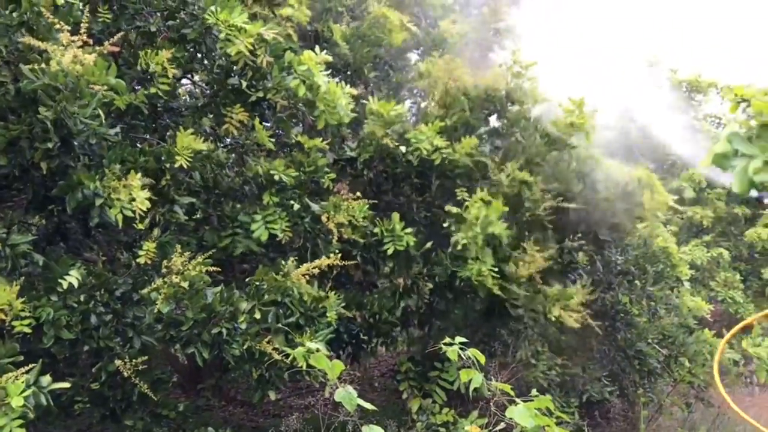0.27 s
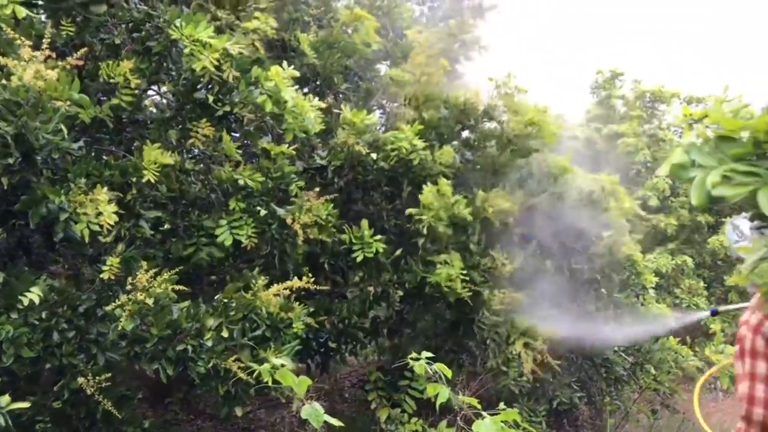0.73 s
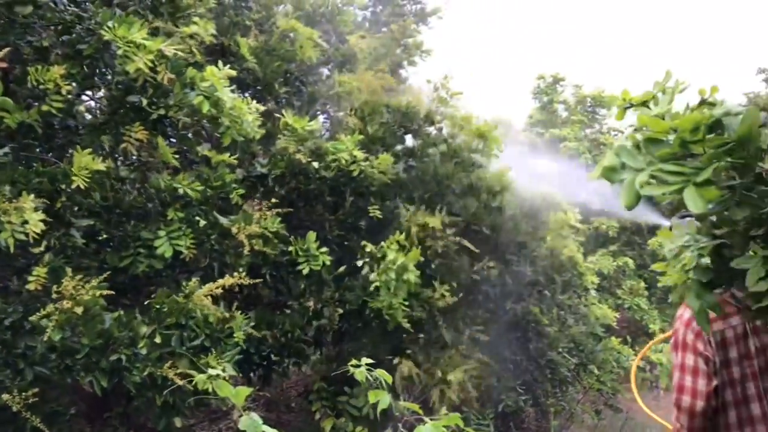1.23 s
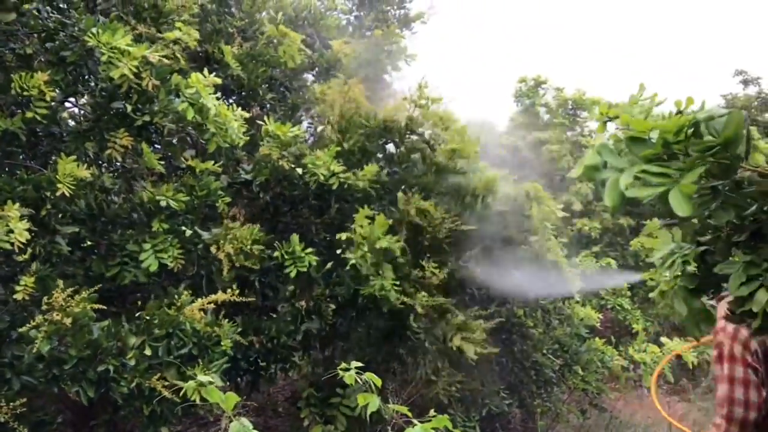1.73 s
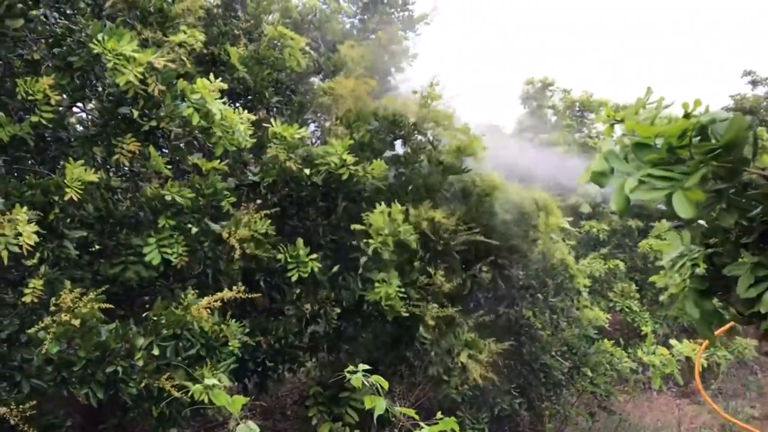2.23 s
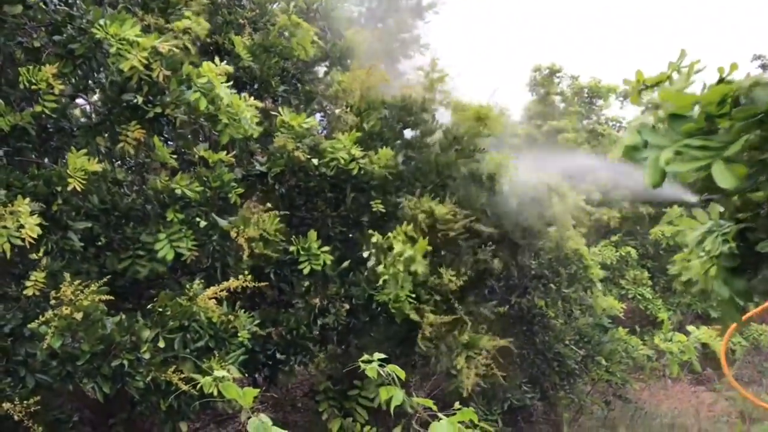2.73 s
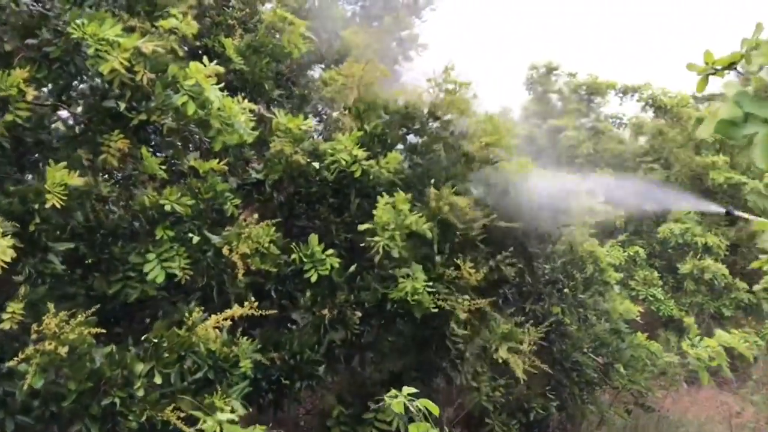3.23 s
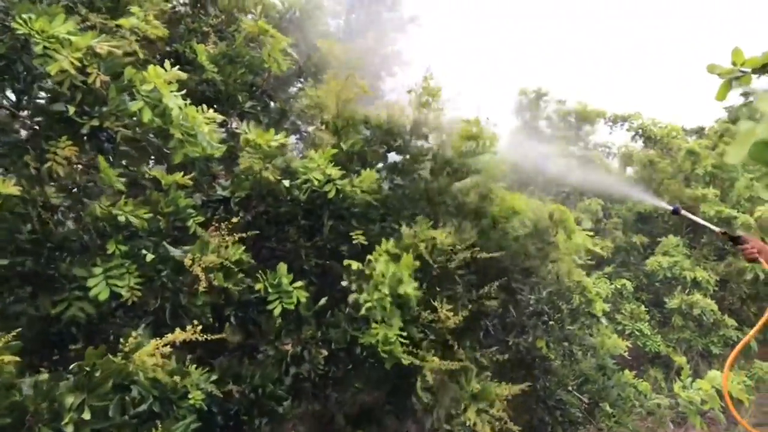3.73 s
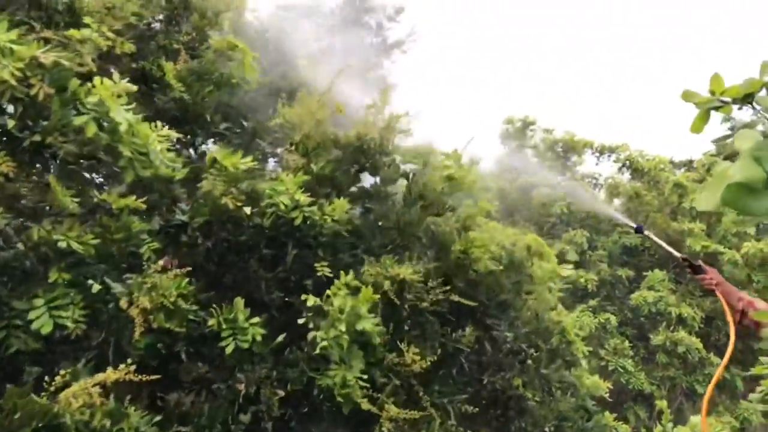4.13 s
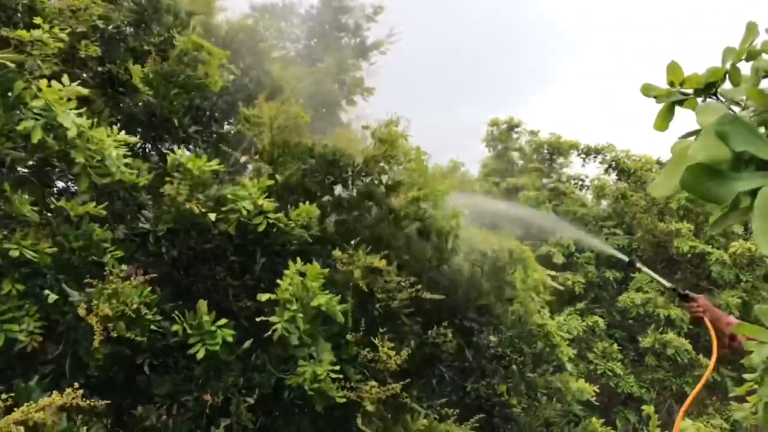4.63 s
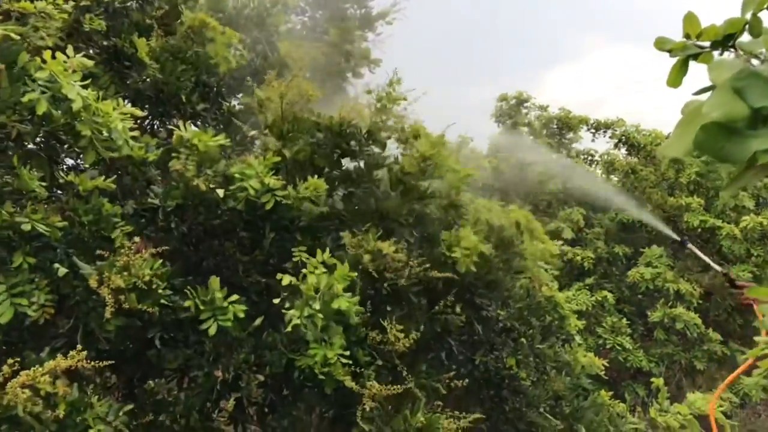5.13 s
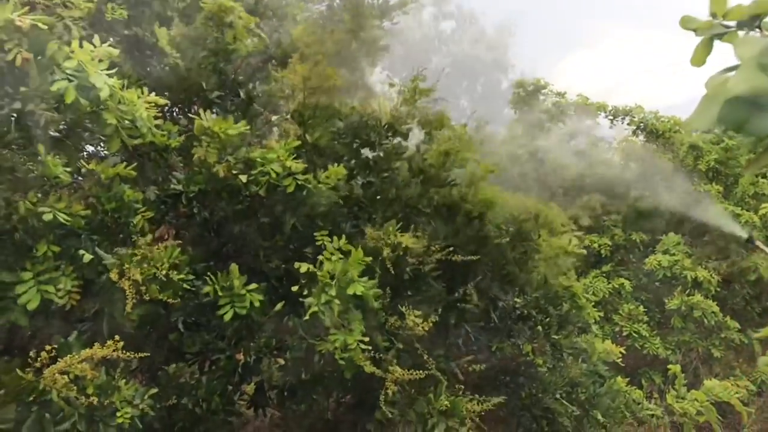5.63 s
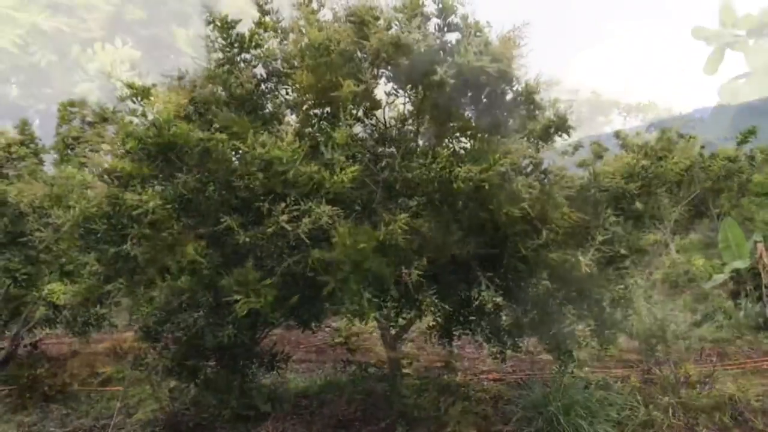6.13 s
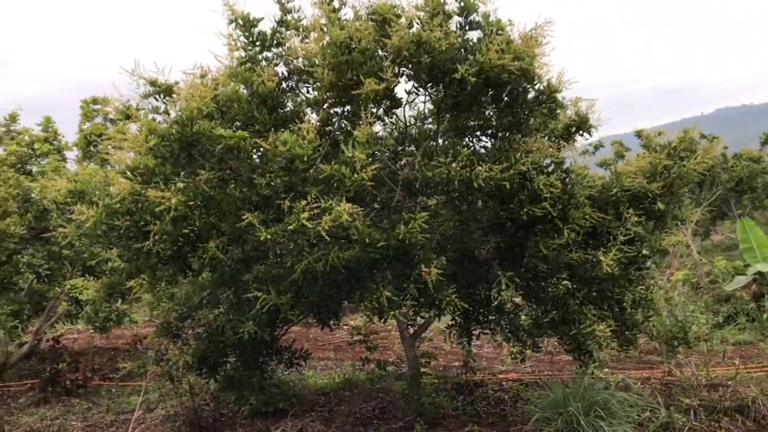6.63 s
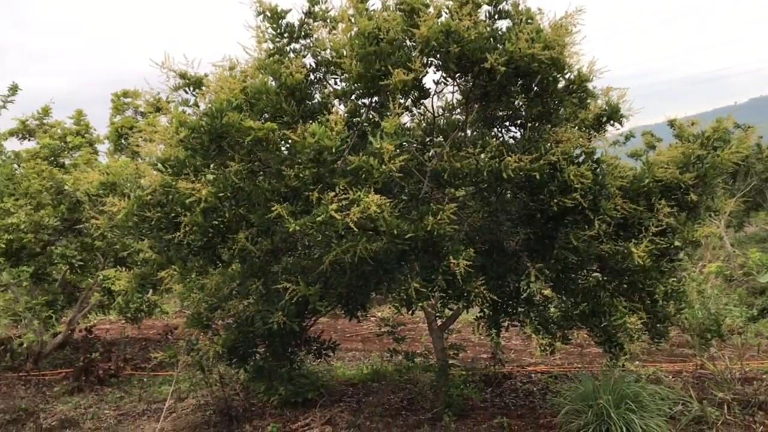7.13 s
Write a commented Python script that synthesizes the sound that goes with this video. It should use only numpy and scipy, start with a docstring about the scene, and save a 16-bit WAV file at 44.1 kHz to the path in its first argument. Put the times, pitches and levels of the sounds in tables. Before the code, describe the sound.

Hissing spray sweeps across foliage in uneven surges, a small engine throbbing far off, before giving way to light wind and faint chirps.

```python
"""A pressure wand sprays mist into orchard trees. The turbulent jet hisses at the nozzle; droplets patter
on leaves at each sweep and now and then slap close by. A small pump engine throbs further off.
The spraying fades into a quiet orchard: wind on the microphone, low rustle, a dull tap and faint chirps.
With these comes a soft mid-range hush with a faint, even high hiss on top.
One microphone feeds both channels."""
import sys
import numpy as np
from scipy import signal
from scipy.fft import rfft, irfft, next_fast_len
from scipy.io import wavfile
from scipy.ndimage import uniform_filter1d, map_coordinates

SR = 44100
rng = np.random.default_rng(int(sys.argv[2]) if len(sys.argv) > 2 else 0)


def store_wav(level_fs):
    """Save 16-bit WAV to argv[1]."""
    pcm = np.round(np.clip(np.atleast_2d(level_fs), -1, 1) * 32767)
    wavfile.write(sys.argv[1], SR, pcm.T.astype(np.int16))


N = 325458
TIME_S = np.arange(N) / SR

# jet, narrower and stronger midway: t/s, nozzle band level/dB, mist level between sweeps/dB
JET_LEVELS = [(0.0, -53.5, -46), (1.5, -54, -52), (2.9, -53.5, -51), (3.5, -52.5, -42.5), (4.3, -52, -43),
              (4.75, -52, -43), (5.5, -53.5, -41.5), (6.45, -54, -41)]
# spectra of fine and fat drops on leaves: f/Hz, density/dB
FINE_SPECTRUM = [(800, -38), (2500, -14.5), (4000, -7.5), (8000, -1.5), (16000, 1.5)]
FAT_SPECTRUM = [(200, -18), (1000, -11), (2500, -5.5), (4000, 0), (7000, 0.5), (16000, -4.5)]


def amp(db):
    """dB to gain."""
    return 10 ** (np.asarray(db) / 20)


def unit(x):
    """Scale to rms 1."""
    return x / np.sqrt(np.mean(x ** 2) + 1e-20)


def curves(rows):
    """Per-sample curve for each column after t/s."""
    times_s, *columns = np.transpose(rows)
    return [np.interp(TIME_S, times_s, column) for column in columns]


def wobble(rate_hz):
    """Smooth random curve, rms about 1."""
    knots = rng.standard_normal(int(N * rate_hz / SR) + 4)
    return map_coordinates(knots, [TIME_S * rate_hz])


def filtered(x, response):
    """Zero-phase filter with gain response(hz)."""
    size = next_fast_len(N + 8192)
    return irfft(rfft(x, size) * response(np.fft.rfftfreq(size, 1 / SR)), size)[..., :N]


def coloured(x, spectrum, band_hz=(0, SR)):
    """Shape by (f/Hz, level/dB) points on a log axis; rms 1 in the band."""
    points_hz, db = np.transpose(spectrum)
    shaped = filtered(x, lambda hz: amp(np.interp(np.log(hz + 1), np.log(points_hz + 1), db)))
    return shaped / np.std(filtered(shaped, lambda hz: (hz >= band_hz[0]) & (hz <= band_hz[1])))


def patchy(depth_db, frames=10):
    """White noise with random gain patches in time and frequency."""
    bins = signal.stft(rng.standard_normal(N), nperseg=512)[2]
    patches = uniform_filter1d(rng.standard_normal(bins.shape), size=5, axis=0)
    patches = uniform_filter1d(patches, size=frames, axis=1)
    return signal.istft(bins * amp(depth_db * unit(patches)), nperseg=512)[1][:N]


def swell_power(at_s, hold_s, db, rise_db_per_s, fall_db_per_s):
    """Power envelope: rise until at_s, hold, fall."""
    before_s = np.maximum(at_s - TIME_S, 0)
    after_s = np.maximum(TIME_S - at_s - hold_s, 0)
    return amp(db - rise_db_per_s * before_s - fall_db_per_s * after_s) ** 2


def bell(at_s, half_width_s, exponent=2):
    """Envelope with peak 1, down to 1/e one half-width away."""
    return np.exp(-np.abs((TIME_S - at_s) / half_width_s) ** exponent)


def nozzle():
    """Turbulent jet: broad rush whose colour drifts as the wand swings."""
    spectrum = [(60, -41), (150, -5), (310, -5.5), (500, -7), (620, -6), (740, -4), (900, -4), (1050, -0.5),
                (2500, -3), (6000, -7.5), (16000, -9)]  # jet noise: f/Hz, density/dB
    jet_db, _ = curves(JET_LEVELS)
    rush = coloured(patchy(depth_db=0.7, frames=50), spectrum, band_hz=(700, 2000))
    return amp(jet_db + 0.83 * wobble(7)) * rush


def droplets(rate_hz, spread_db):
    """Random impacts of either sign and uneven size."""
    hits = rng.random(N) < rate_hz / SR
    signs = rng.choice([-1, 1], N)
    sizes = amp(spread_db * np.clip(rng.standard_normal(N), -2, 2))
    return unit(hits * signs * sizes)


def foliage():
    """Mist hiss and impacts on leaves; near leaves give fatter, duller, sparser drops."""
    # jet sweeps over foliage: t/s, hold/s, level/dB, rise/(dB/s), nearness 0-1
    sweeps = [(0.0, 0.18, -38.5, 70, 0.27), (.47, 0.23, -40, 70, 0.38), (.79, 0.027, -38, 43, .3),
              (0.913, .02, -37, 52, 0.45), (1.07, .01, -41, 60, 0.24), (1.34, .01, -41, 47, 0.4),
              (1.687, .31, -41.5, 47, 0.39), (2.303, .02, -40.5, 48, 0.47), (2.585, .03, -45, 50, .2),
              (2.715, 0.054, -36, 60, 0.37), (3.223, 0.06, -34.5, 39, 0.3), (3.76, .02, -36.5, 67, .14),
              (4.176, .01, -41.5, 50, .25), (4.446, .01, -33, 110, 0.35), (4.524, 0.0091, -34, 140, 0),
              (4.608, 0.024, -31, 107, .6), (5.5, 0.073, -45.5, 40, 0), (5.97, 0.23, -38.5, 41, 0.08)]
    mist_nearness, fall_ratio = 0.34, 1.96  # the jet exits foliage faster than it enters
    _, mist_db = curves(JET_LEVELS)
    mist_power = amp(mist_db) ** 2
    fine_power, fat_power = (1 - mist_nearness) * mist_power, mist_nearness * mist_power
    for at_s, hold_s, db, rise_db_per_s, nearness in sweeps:
        power = swell_power(at_s, hold_s, db, rise_db_per_s, fall_ratio * rise_db_per_s)
        fine_power += (1 - nearness) * power
        fat_power += nearness * power
    fine = coloured(patchy(depth_db=2) + 0.25 * droplets(rate_hz=900, spread_db=1), FINE_SPECTRUM)
    fat = coloured(patchy(depth_db=1.75) + 0.38 * droplets(rate_hz=600, spread_db=3.5), FAT_SPECTRUM)
    flutter_db = 0.7 * wobble(25) + 0.33 * wobble(70)  # leaves flap in and out of the jet
    return amp(flutter_db) * (np.sqrt(fine_power) * fine + np.sqrt(fat_power) * fat)


def stumble_db():
    """Engine level offset: the note swells, then drops out briefly."""
    stumbles = [(.33, 3.5, 13), (1.19, 2, 11), (2.17, 3, 14), (2.86, 5, 18), (3.9, 4, 12), (4.22, 2.5, 7),
                (5.0, 2, 1), (5.45, -1, 0), (5.8, 1.5, 9)]  # engine dropouts: t/s, swell/dB, depth/dB
    lead_s, swell_s, drop_s = 0.13, 0.15, 0.058
    return sum(swell_db * bell(at_s - lead_s, swell_s) - depth_db * bell(at_s, drop_s)
               for at_s, swell_db, depth_db in stumbles)


def pump():
    """Engine orders, each with its own slowly wandering phase, over pump hum and casing rumble."""
    exhaust_orders = [(4, -6.5), (5, 1), (6, -10), (7, -8.5), (8, -17.5), (10, -15.5)]  # exhaust harmonics: multiple of firing rate, level/dB
    casing_spectrum = [(15, -33), (28, -23), (40, -5), (52, -2), (65, -1), (100, -1), (160, -12),
                       (300, -29)]  # casing rumble: f/Hz, density/dB
    firing_hz, hum_hz, engine_db, drone_db = 15.26, 51.5, -62, -61
    phase = 2 * np.pi * firing_hz * TIME_S
    chug = sum(amp(db + wobble(4.97)) * np.sin(order * phase + 0.99 * wobble(4))
               for order, db in exhaust_orders)
    hum_gain = amp(1.9 * wobble(3.36))
    drifting_hz = hum_hz * (1 + 0.017 * wobble(1.41))
    hum = hum_gain * np.sin(2 * np.pi * np.cumsum(drifting_hz) / SR)
    rumble = amp(-0.5) * coloured(rng.standard_normal(N), casing_spectrum)
    offset_db = stumble_db()
    engine = amp(engine_db + offset_db) * np.sqrt(2) * chug
    drone = amp(drone_db + 0.14 * offset_db) * unit(hum + rumble)
    return engine + drone


def slaps():
    """Short dense showers as a close leaf crosses the jet."""
    showers = [(4.439, -33, .007, .5), (4.457, -34, 0.01, 0.35), (4.529, -34, 0.0083, .6),
               (4.534, -38, 0.0087, 0.6), (4.599, -24, .0055, 0.96), (4.621, -29.5, 0.017, 0.9),
               (4.656, -35.5, 0.016, 0.1), (5.568, -28.5, .0008, .1)]  # leaf crossings: t/s, peak level/dB, half-width/s, nearness 0-1
    fine, fat = (coloured(rng.standard_normal(N) + 0.5 * droplets(rate_hz=1475, spread_db=1), spectrum)
                 for spectrum in (FINE_SPECTRUM, FAT_SPECTRUM))
    return sum(amp(db) * bell(at_s, half_width_s, exponent=1.4)
               * (np.sqrt(1 - nearness) * fine + np.sqrt(nearness) * fat)
               for at_s, db, half_width_s, nearness in showers)


def wind():
    """Air buffets the microphone: low flutter, louder in gusts."""
    gusts = [(6.5, 0.32, -63), (7.04, .01, -64)]  # wind gusts: t/s, hold/s, level/dB
    spectrum = [(15, -43), (30, -6), (50, 0.5), (75, -2.5), (120, -9), (250, -47)]  # buffeting: f/Hz, density/dB
    calm_db, slope_db_per_s = -68, 112
    gust_power = sum(swell_power(*gust, slope_db_per_s, slope_db_per_s) for gust in gusts)
    buffet = unit(amp(1.8 * wobble(12)) * coloured(rng.standard_normal(N), spectrum))
    return np.sqrt(amp(calm_db) ** 2 + gust_power) * buffet


def rustle():
    """Steady low rustle."""
    spectrum = [(60, -31), (130, 1), (270, -1.5), (400, -9.5), (800, -17.5), (2000, -36)]  # rustle: f/Hz, density/dB
    return amp(-70) * coloured(rng.standard_normal(N), spectrum, band_hz=(150, 600))


def hush_and_hiss():
    """Soft mid-range hush with a faint, even high hiss on top."""
    spectrum = [(200, -18), (500, 0.5), (1000, 0.5), (2000, -4), (4000, -8.5), (8000, -12), (12000, -12.5),
                (16000, -10)]  # hush and hiss: f/Hz, density/dB
    return amp(-69.5) * coloured(rng.standard_normal(N), spectrum)


def tap_and_chirps():
    """One dull tap, then faint far chirps: short, slightly rough tones, most of them gliding."""
    glides = [(6.278, .005, 720, 680, -61), (6.445, .018, 9100, 9300, -75), (6.53, .02, 6400, 6360, -82),
              (6.695, .016, 9100, 9100, -78), (6.81, .018, 9150, 9100, -82), (7.275, .009, 5400, 4950, -75)]  # tone bursts: t/s, half-width/s, start f/Hz, end f/Hz, peak level/dB
    tones = np.zeros(N)
    for at_s, half_width_s, start_hz, end_hz, db in glides:
        offset_s = TIME_S - at_s
        mid_hz = (start_hz + end_hz) / 2
        glide_hz_per_s = (end_hz - start_hz) / (2 * half_width_s)
        cycles = mid_hz * offset_s + glide_hz_per_s * offset_s ** 2 / 2
        tones += amp(db) * bell(at_s, half_width_s) * np.sin(2 * np.pi * cycles)
    rasp_db = 3 * wobble(250)
    return amp(rasp_db) * tones


def scene():
    """Linear crossfade from spraying to quiet; dual mono."""
    fade_start_s, fade_s = 5.435, 1
    fade = np.clip((TIME_S - fade_start_s) / fade_s, 0, 1)
    spraying = nozzle() + foliage() + slaps() + pump()
    quiet = wind() + rustle() + hush_and_hiss()
    mono = (1 - fade) * spraying + fade * quiet + tap_and_chirps()
    return np.array([mono, mono])


def record(dry):
    """Microphone and housing colour, then a steep low-pass."""
    housing = [(4920, 76, -5), (7640, 580, -4), (10440, 230, -4), (12500, 1050, 5), (14900, 610, -2)]  # housing dips and one broad peak: f/Hz, width/Hz, gain/dB
    top_hz, edge_hz = 15740, 60

    def response(hz):
        colour_db = sum(db * np.exp(-0.5 * ((hz - centre_hz) / width_hz) ** 2)
                        for centre_hz, width_hz, db in housing)
        low_pass = np.clip((top_hz - hz) / edge_hz + 0.5, 0, 1) ** 2
        return amp(colour_db) * low_pass

    return filtered(dry, response)


dry = scene()
out = record(dry)
store_wav(out)
```